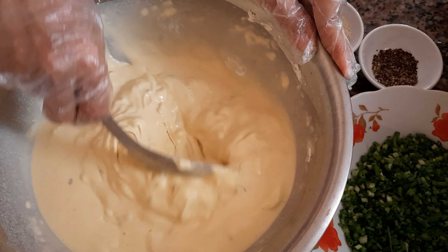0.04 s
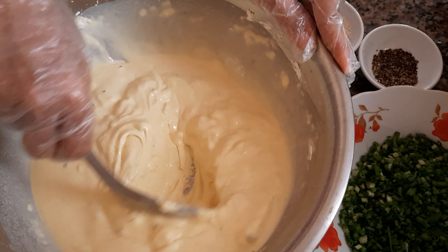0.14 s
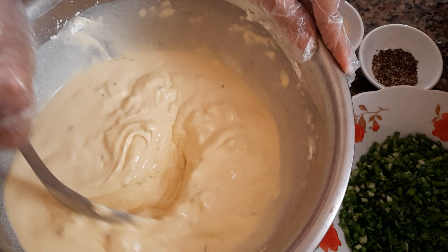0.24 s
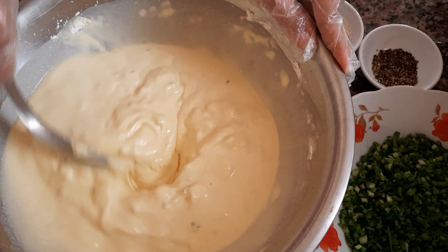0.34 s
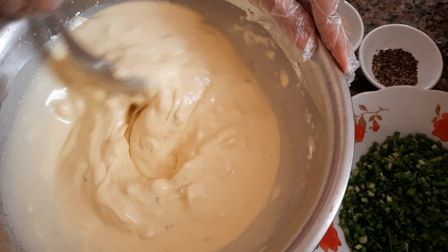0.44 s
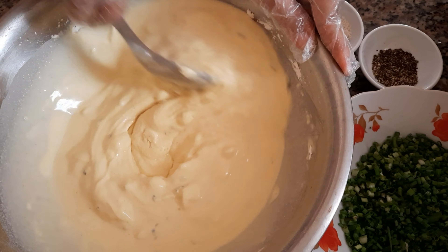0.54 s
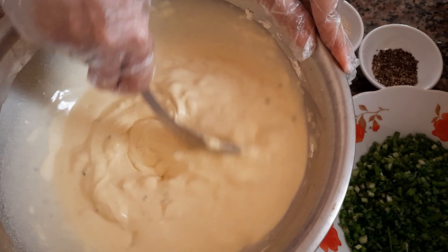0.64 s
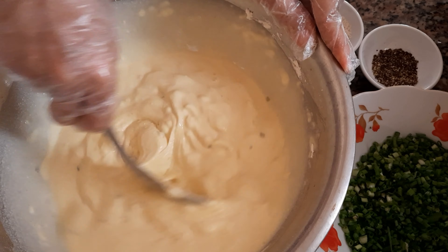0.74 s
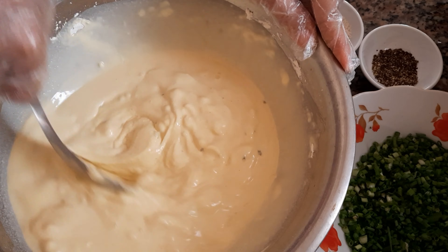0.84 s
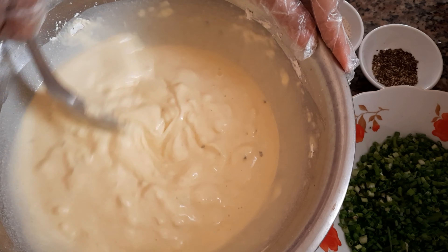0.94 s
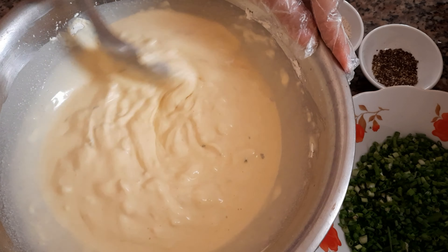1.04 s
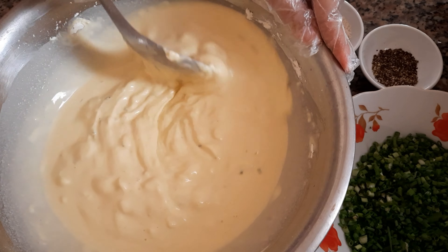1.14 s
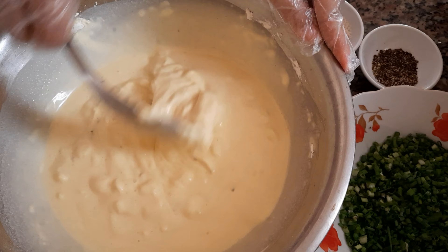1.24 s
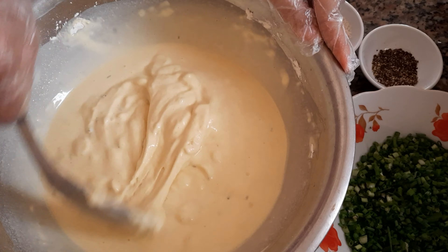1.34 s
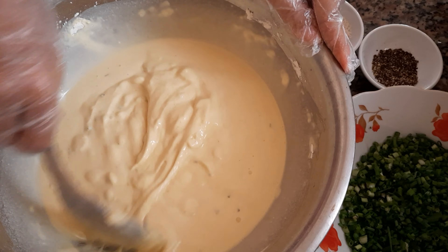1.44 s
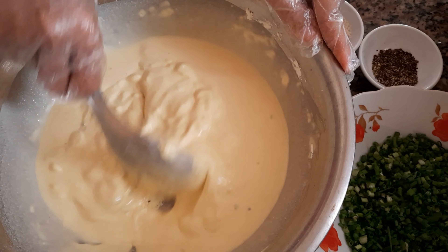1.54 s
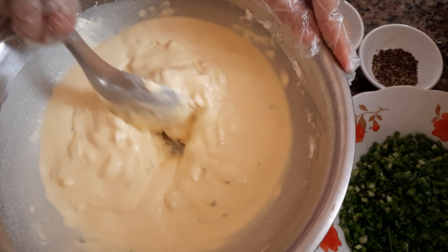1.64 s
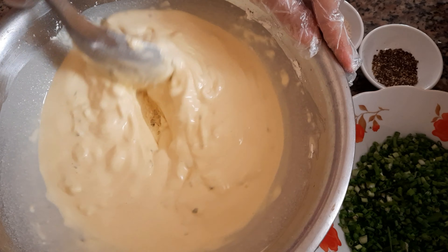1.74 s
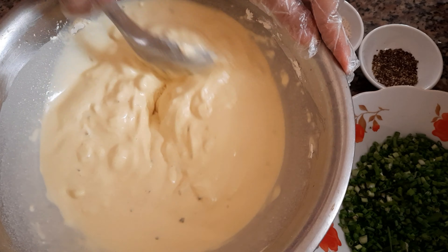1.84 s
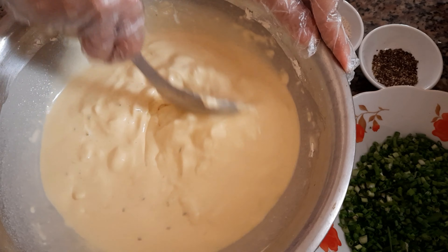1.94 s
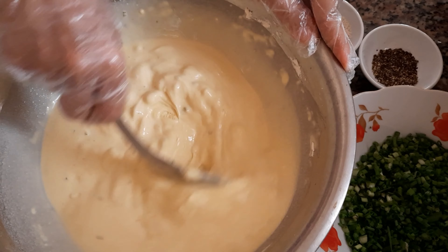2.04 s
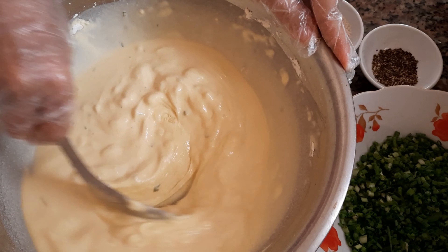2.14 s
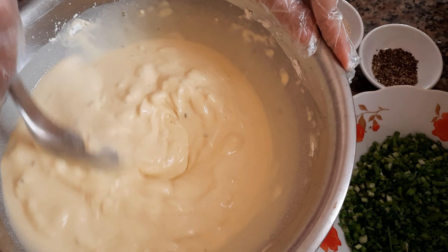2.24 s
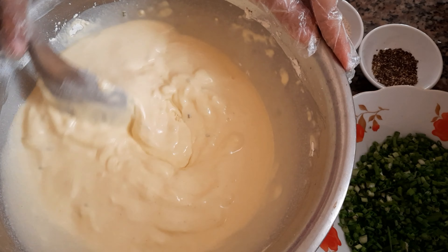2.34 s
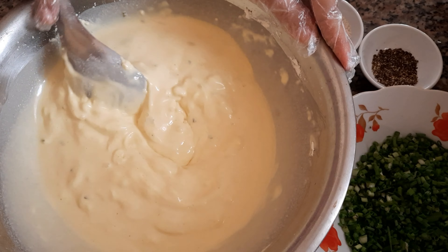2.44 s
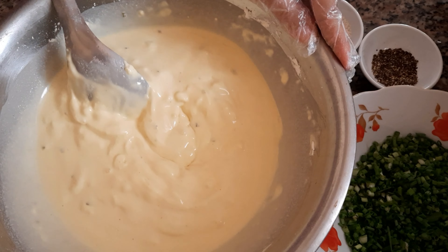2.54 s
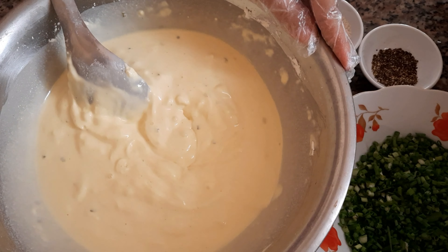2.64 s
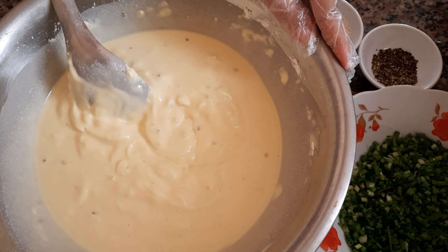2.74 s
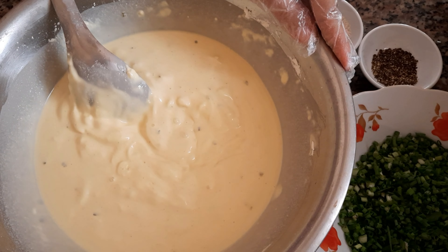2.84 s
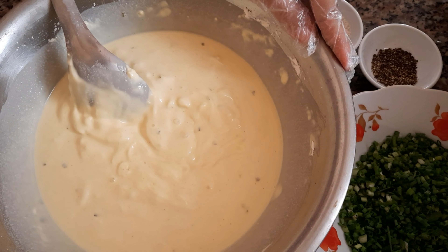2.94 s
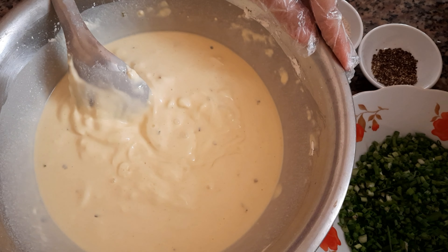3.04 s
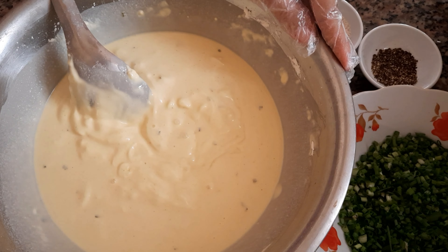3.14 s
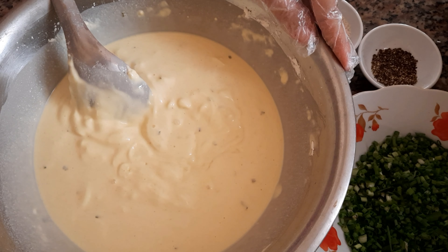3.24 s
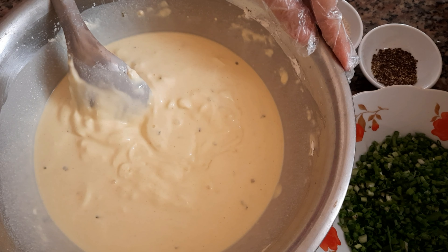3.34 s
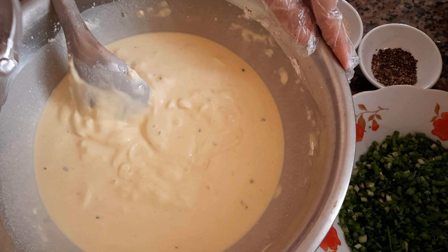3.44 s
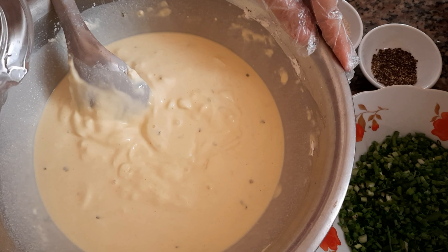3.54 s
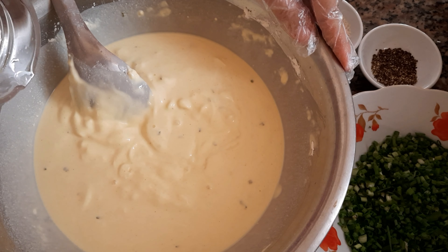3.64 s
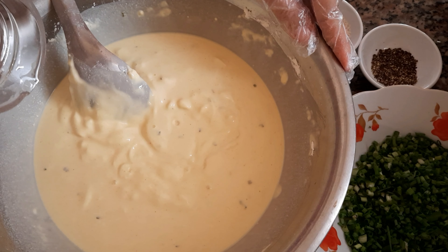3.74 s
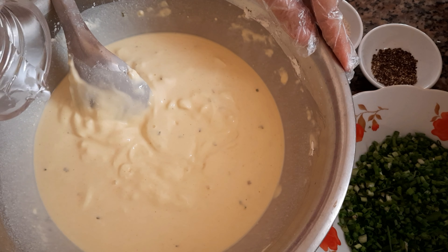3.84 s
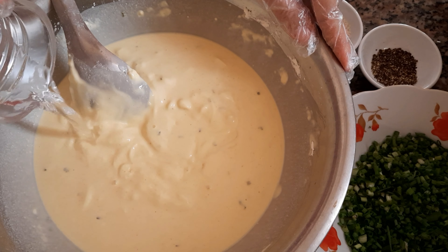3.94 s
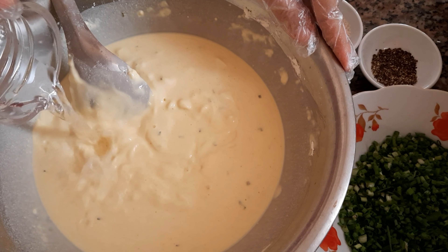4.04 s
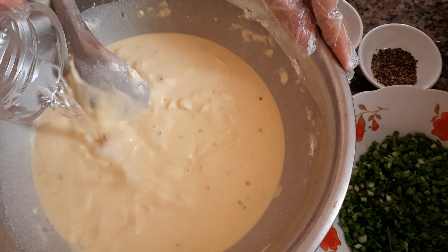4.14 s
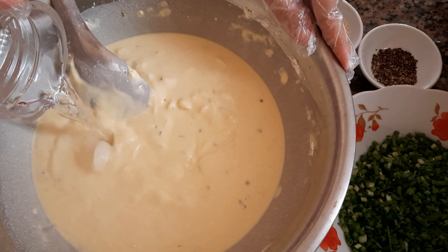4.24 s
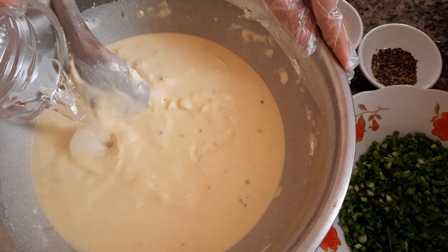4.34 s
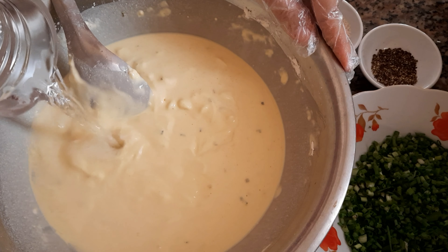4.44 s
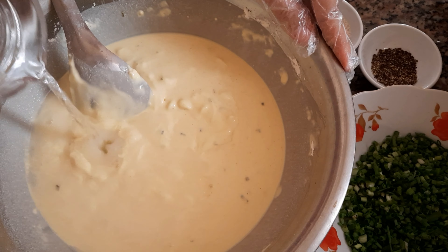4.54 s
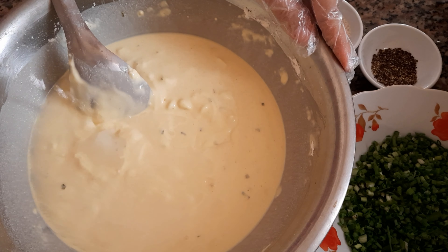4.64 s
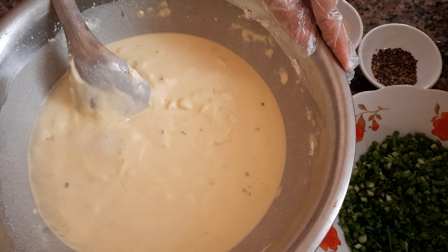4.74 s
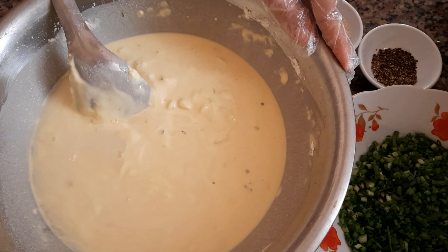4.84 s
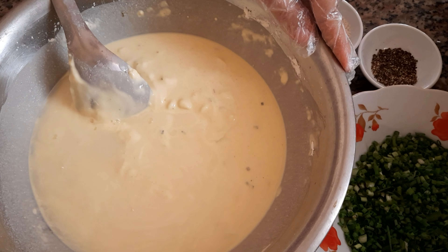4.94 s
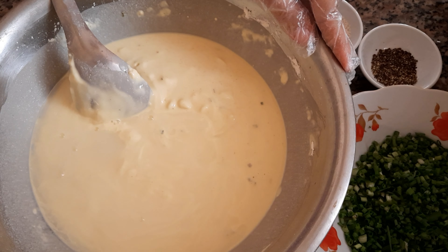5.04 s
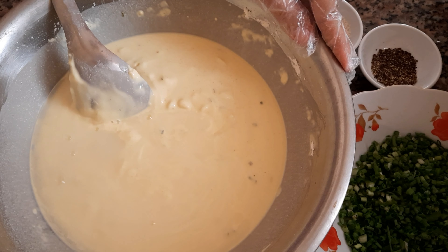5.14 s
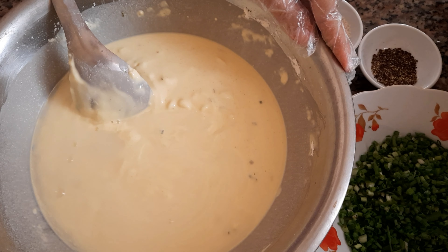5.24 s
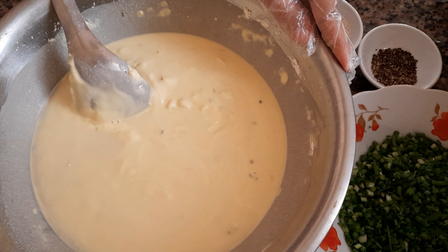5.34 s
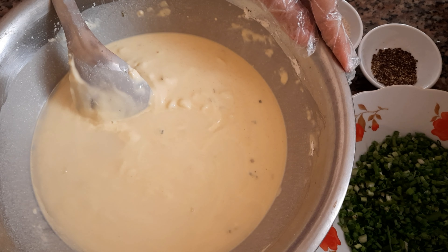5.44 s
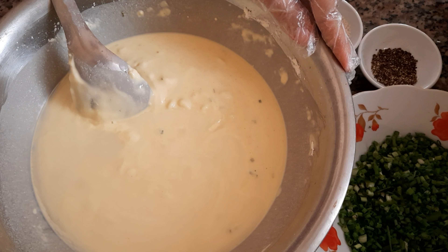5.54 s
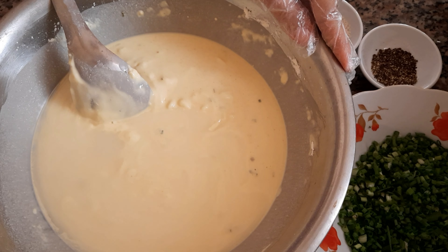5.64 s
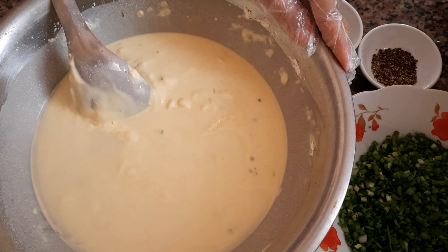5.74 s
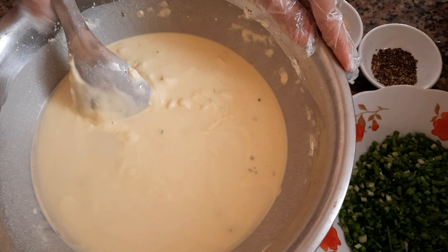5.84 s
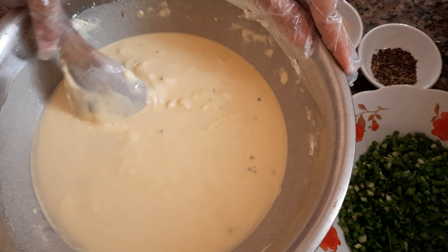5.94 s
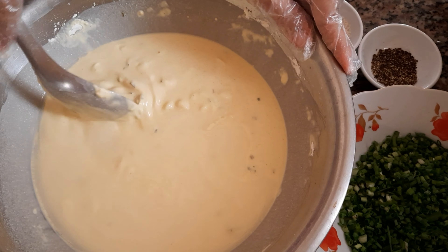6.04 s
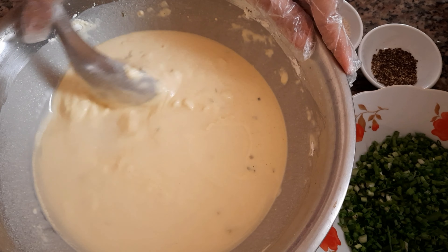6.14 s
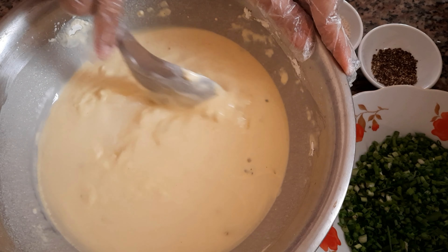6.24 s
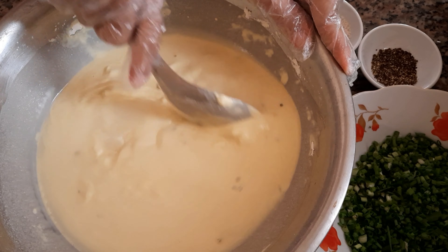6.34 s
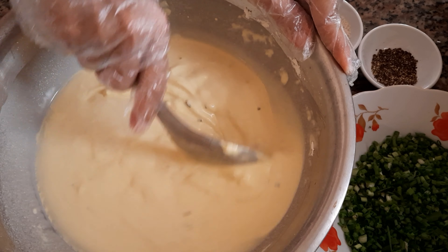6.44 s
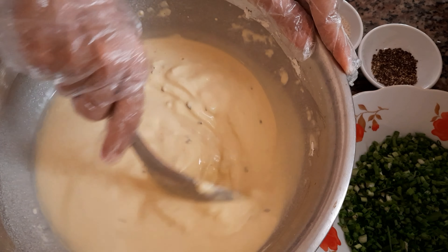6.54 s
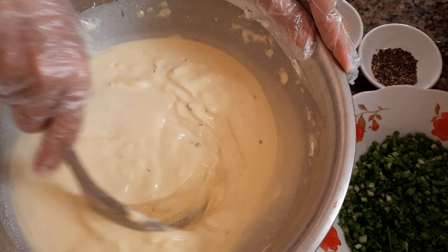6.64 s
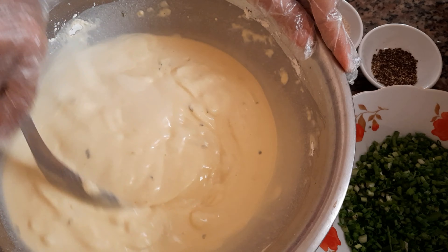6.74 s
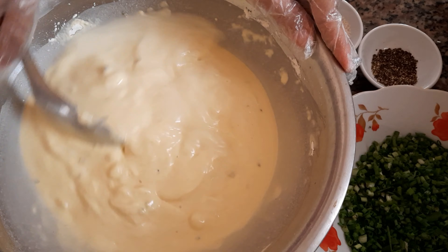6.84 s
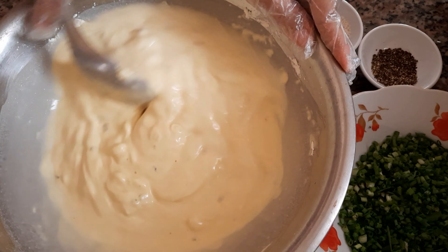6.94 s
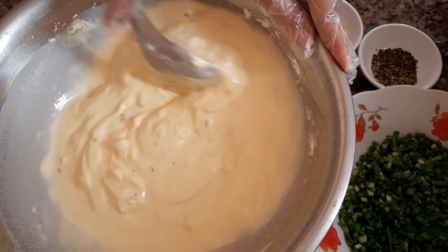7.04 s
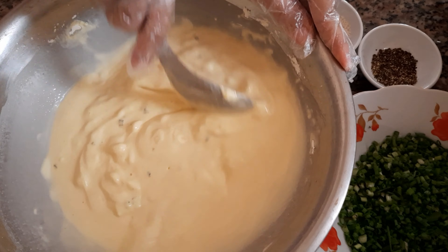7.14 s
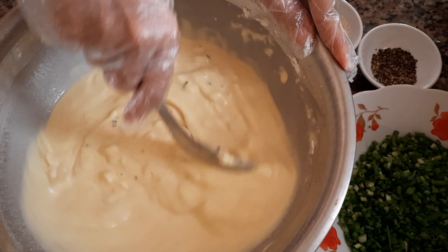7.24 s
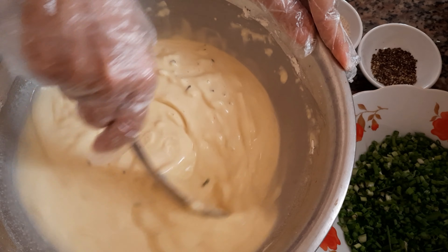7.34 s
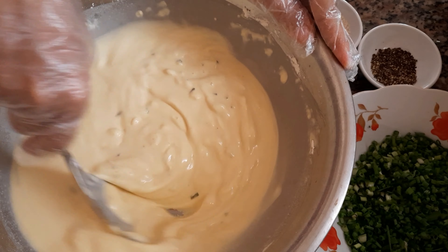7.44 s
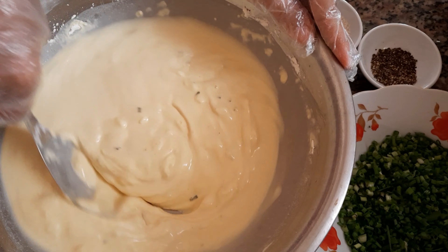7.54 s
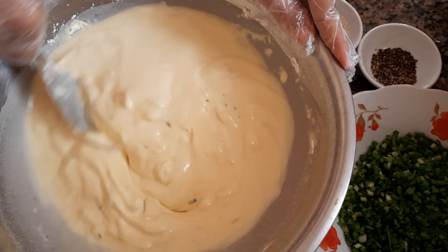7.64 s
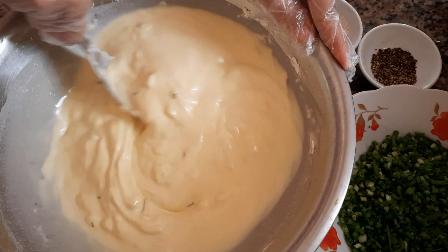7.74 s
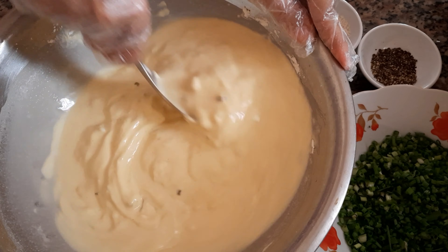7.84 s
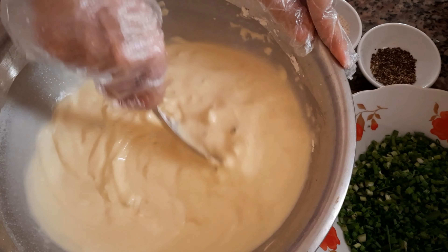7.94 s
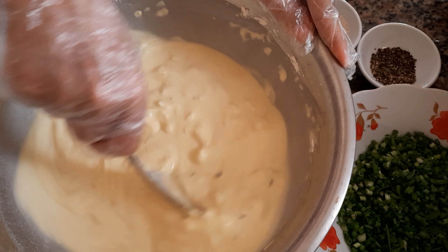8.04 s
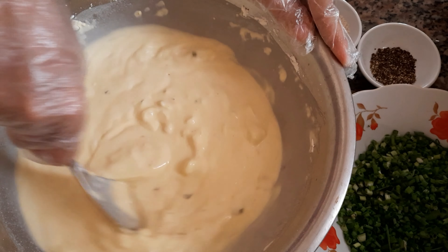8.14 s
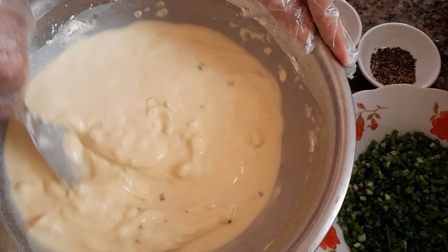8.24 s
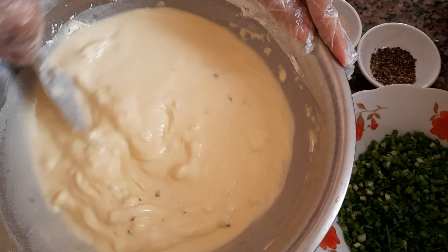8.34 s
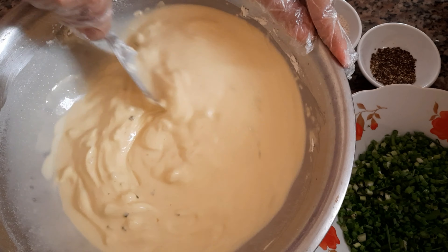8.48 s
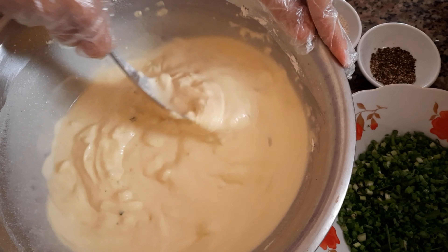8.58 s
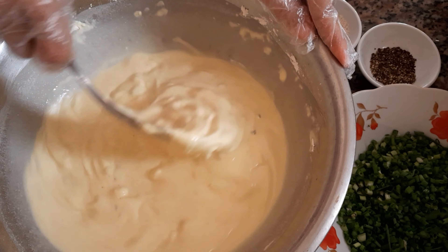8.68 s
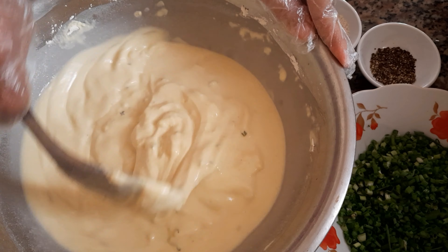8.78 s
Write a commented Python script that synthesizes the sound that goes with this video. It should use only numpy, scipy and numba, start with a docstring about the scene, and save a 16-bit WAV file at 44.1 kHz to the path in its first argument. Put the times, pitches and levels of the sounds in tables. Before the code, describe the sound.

A metal spoon stirs thin batter in a steel bowl, with wet scraping, small squelches and a few dull knocks, while thin plastic gloves crinkle. The stirring stops, a glass jar clinks, and a little water patters onto the batter. The jar is set down with ringing clinks and a hollow note, then the stirring resumes. It is heard close up in a kitchen, with a short echo and a low rumble underneath.

```python
"""A kitchen worktop, with two microphone ports a few centimetres apart just to the right of the work.
A gloved hand stirs batter in a steel bowl, stops, pours water from a glass jar and stirs on.
The steel spoon drags and knocks, ringing the damped bowl; air pockets squelch in the batter and thin
plastic gloves crinkle. The jar clinks, the air inside it hoots, and drops tick on the batter.
Tiles return a short echo, and a low kitchen rumble lies under it all."""
import sys
import numpy as np
from scipy import signal
from scipy.fft import rfft, irfft, next_fast_len
from scipy.io import wavfile
from scipy.ndimage import uniform_filter1d
from numba import njit

SR = 44100
rng = np.random.default_rng(int(sys.argv[2]) if len(sys.argv) > 2 else 0)


def wav_record(signal):
    """Record a signal, one row per channel, as 16-bit PCM in the file named by sys.argv[1]."""
    frames = np.transpose(np.atleast_2d(signal))
    bounded = np.clip(frames, -1, 1)
    # unit amplitude maps onto the largest positive 16-bit level
    quanta = np.round(bounded * 32767).astype(np.int16)
    wavfile.write(sys.argv[1], SR, quanta)


N = 388521

# kitchen and worktop rumble: (time [s], level [dB], boom centre [Hz], part above 170 Hz [relative dB])
RUMBLE_TRACK = [(0.0, -40, 119.7, -3.5), (0.37, -39, 143, -9.5), (0.8, -44.5, 133, -1.5),
                (1.15, -39.5, 113.5, -5.5), (1.8, -43.5, 125, -7), (2.3, -43, 127.4, -6.5),
                (2.5, -41.5, 135.4, -7.5), (3.05, -42.5, 108, -4), (3.8, -52, 103.7, -10),
                (4.5, -50, 102, -6), (5.35, -45, 108.6, -8), (5.55, -35.5, 124, -6.5),
                (5.9, -49.5, 100.5, -12.5), (6.5, -48.5, 99.5, -9), (7.0, -46, 110, -8),
                (7.35, -47, 112.4, 1.5), (7.75, -42.5, 91.5, -2), (8.3, -45.5, 103, 1),
                (8.81, -47, 118.3, 1.5)]
# spectra of the rumble and of the kitchen air: (frequency [Hz], density [relative dB])
RUMBLE_SPECTRUM = [(12, -42.5), (20, -4), (32, -13), (75, -0.5), (140, -0.5), (163, -0.5), (198, -4.5),
                   (345, -25), (520, -36), (680, -71), (1140, -120)]
AIR_SPECTRUM = [(180, -47.5), (300, 9), (978, -31), (2100, -8), (4590, -46.5), (6300, -14.5),
                (11700, -23.5), (15000, -21), (16000, -7)]
# steady work of the hands: (time [s], spoon drag [dB], its upper resonances [relative dB],
# glove rub [dB], its top above 9 kHz [relative dB])
HAND_WORK = [(0.0, -55.5, -3, -78, -2), (0.16, -68.5, -1, -70, 5), (0.24, -52.5, 3.5, -52, -2),
             (0.5, -49.5, -2, -51, -2), (0.72, -61.5, 2, -60.5, -4), (0.85, -56, 4.5, -66, -13),
             (1.12, -46.5, -4, -52, -3), (1.26, -62.5, -3, -70, 2), (1.47, -58, -4, -79, 7),
             (1.7, -57, -6, -62.5, 1), (1.82, -65, 10, -61.5, -2.5), (1.92, -65, -1, -58.5, 0),
             (2.2, -53.5, 5, -54.5, -4), (2.55, -48, -17.5, -51, 0.5), (2.8, -65, 9, -52.5, 0.5),
             (3.0, -53.5, 5.5, -50.5, -2.5), (3.32, -70, -0.5, -75, -4), (3.55, -77.5, 3, -70.5, -1),
             (3.8, -77.5, -1.5, -86.5, 3.5), (4.03, -79.5, 1, -79, 4.5), (4.15, -83, -0.5, -71, -2),
             (4.25, -69, 4, -74.5, -6), (4.52, -67.5, 8.5, -65.5, -2), (4.62, -83, -3, -82, -4),
             (4.78, -54, 0, -51.5, 0), (5.07, -72, 4, -55.5, 0), (5.25, -74.5, 10.5, -67, -13),
             (5.5, -49, 9, -64, -7), (5.8, -57.5, 2, -53.5, 2), (6.18, -68, -3, -60.5, 6),
             (6.46, -54, -10, -57.5, -4), (6.65, -51, 5.5, -59, -3), (6.93, -52, -2, -54, -2),
             (7.08, -64, -4, -61, -6), (7.45, -56, 4, -60, -0.5), (7.86, -54, 1, -60.5, -1),
             (8.3, -56, 2.5, -60, -3), (8.81, -64.5, 6.5, -59, 1)]
# single scrapes and splashes in the bowl, then single rubs of glove on glove or rim:
# (peak time [s], level [dB], 20 dB rise [s], 20 dB fall [s], upper part [relative dB])
# a rise or fall under 3 ms, negative ones included, acts as 3 ms
BOWL_SCRAPES = [(0.0, -48, .01, 0.04, -14), (0.25, -49.5, 0.35, 0.1, -9), (0.493, -46, 0.27, 0.65, -9),
                (1.14, -46, 0, 0.26, -6), (1.497, -42.5, -0.23, 0.05, 5.5), (1.64, -50, 0.23, -0.5, 1),
                (1.905, -33.5, 0.04, 0.2, -34), (2.404, -47.5, 0, 0.43, -3), (2.464, -45, -0.03, 0.37, -6),
                (2.573, -36.5, 0.04, 0.0347, -5), (2.898, -35.5, -0.08, 0.11, -3.5),
                (2.965, -39, -0.1, 0.11, -7), (4.2, -68, 0.5, 0.5, -7), (4.55, -57, -0.08, 0.16, 1.5),
                (4.656, -45.5, -0.17, 0.08, -3), (4.68, -53, 0.18, -1.5, -12), (4.85, -43, -0.35, 0.19, -8),
                (5.35, -60, -0.4, .1, -9), (5.46, -42, 0.03, 0.16, -2), (5.61, -36, 0.09, 0.25, -2),
                (5.939, -39, -0.1, 0.22, -8), (6.046, -50, 0.3, 0.17, 7.5), (6.22, -51.5, -2, 1, 1.5),
                (6.54, -52.5, -1.6, 1.5, -10), (7.11, -56.5, 1, 0.3, 3), (7.21, -50, 0.1, 0.17, 0.5),
                (7.64, -50, .06, 0.8, -18), (7.8, -49, 0.24, .5, -14), (8.52, -45.5, 0.64, 0, -9),
                (8.59, -47.5, 0, 0.04, -5)]
GLOVE_RUBS = [(0.012, -58.5, 2, 0.1, -2), (0.206, -52, 0.07, 0.34, -11), (0.509, -45.5, 0, 0.1, -4.5),
              (0.824, -53.5, 0.13, .5, -1.5), (1.226, -58.5, 0.2, 0, 6), (1.509, -42, -0.19, 0.01, -2),
              (1.585, -34, 0.07, 0.0149, -1.5), (1.66, -31, 0.1067, -0.0073, -9.5), (1.76, -56, 0.03, 0, 5),
              (1.87, -45, -0.23, -0.22, 2), (2.33, -57, 0.1, 1.1, 4.5), (2.574, -43, 0.18, -0.04, 0.5),
              (2.68, -57, 1, -0.2, -11), (2.883, -45.5, -0.2, .5, 0.5), (4.18, -62.5, 0.07, 0.13, 3),
              (4.3, -70, 0, 0.5, -1), (4.69, -56, 0.22, 0.2, -4), (4.75, -55.5, 0.24, 0.4, 1.5),
              (5.3, -53.5, 0.05, 0, -2), (5.37, -52, 0, 0.13, -7), (5.61, -45, 0.12, -0.5, -11),
              (5.691, -44, 0.13, .05, -1), (5.891, -45, 0.03, 0, -2), (5.949, -43.5, -0.02, .5, 0.5),
              (6.07, -44, 0.04, -0.08, 1), (6.22, -55, -1.74, .5, -1), (6.52, -54.5, -0.5, 1, -6),
              (6.83, -49.5, -0.4, 0.23, -1.5), (7.16, -53, -0.03, 0.1, 2), (7.33, -58, -1.5, 0.5, -5),
              (7.45, -54.5, -0.04, 0.8, -4), (7.62, -49, 0, 0.17, 2), (7.929, -53.5, 0.05, -0.75, 6),
              (8.18, -54.5, 0.1, -4, 0.5), (8.449, -50, 0.1, -0.17, 0), (8.594, -44.5, -0.02, 0, 3.5),
              (8.79, -50, 0, 0, 6)]
# resonances of the batter-damped bowl: (frequency [Hz], width [Hz], level [relative dB])
BOWL_MODES = [(685, 130, 0.5), (1027, 170, -5.5), (1290, 420, -1), (2110, 950, -2.5), (381, 350, -6),
              (1963, 110, -11.5), (2536, 100, -8.5), (4220, 400, -8)]
# crackle of thin plastic: (frequency [Hz], density [relative dB])
GLOVE_SPECTRUM = [(1180, -14.5), (2000, -5), (2220, -2.5), (3310, -4), (4410, -5), (4770, -6.5),
                  (8260, 1.5), (9740, -15), (13100, -8), (14900, -12.5), (16000, -23.5)]
# glove folds snapping: (time [s], peak [dB], centre [Hz], left minus right [dB])
GLOVE_FOLDS = [(0.205, -36, 6100, -2), (0.4973, -38, 3530, -9), (0.6345, -36.5, 7900, -3),
               (0.826, -41, 6560, -12), (0.9877, -44, 4970, 1.0), (1.075, -44, 5060, 1.5),
               (1.223, -35, 6100, -8), (1.3304, -61, 6000, -8), (1.3468, -42, 12700, 1.5),
               (1.4765, -49, 7040, 0.5), (1.502, -38.5, 4240, 7), (1.512, -30, 6420, 5),
               (1.549, -31, 2500, -0.5), (1.5868, -32, 4200, -1), (1.6575, -25, 2380, -2.5),
               (1.6588, -23, 6550, -2), (1.784, -45, 6100, -2), (2.2925, -29, 6440, 0),
               (2.458, -35, 8370, 0.0), (2.7876, -77, 7860, 17), (3.131, -37, 8170, 9),
               (3.245, -48, 8030, 7), (3.253, -42, 8710, 5), (3.305, -43.5, 12000, 4),
               (3.3588, -44, 8850, 10), (3.3862, -48, 5500, 2), (3.3972, -40, 13100, 5),
               (3.426, -41.5, 12900, 5), (3.465, -45.5, 6300, 8), (3.5026, -47.5, 5650, 3),
               (3.5358, -50, 13000, 4.5), (3.5558, -49, 12200, -3), (3.5698, -48, 12800, 3),
               (3.6097, -54, 5240, 3), (3.6157, -49, 10800, 2.2), (3.6391, -52, 11100, 5),
               (3.677, -56, 7200, 4), (3.7099, -55, 8550, 3), (3.7553, -57.5, 13900, 6),
               (3.7867, -46, 11540, 8), (3.8222, -52, 12000, 2.5), (3.8347, -42.5, 13100, 6),
               (4.681, -30, 3750, -2), (4.7223, -36.5, 12700, 9), (4.7528, -33, 9000, 13),
               (4.7986, -37.5, 3120, 13), (4.825, -42, 6200, 8), (5.065, -40, 6740, 7),
               (5.2924, -49, 6200, 0), (5.8589, -51, 4860, 1.0), (5.939, -32.5, 7100, -3),
               (6.4106, -39, 12800, -3), (6.462, -44, 11000, 0), (6.8052, -36, 3590, 7),
               (6.933, -34, 4700, 11), (7.4328, -47, 7160, -0.5), (7.6169, -33.5, 8450, 1.5),
               (7.691, -33.5, 8110, -3), (7.776, -32.5, 9000, -5), (7.8773, -47, 5410, 5),
               (8.564, -39, 6890, 0.0), (8.5935, -34, 12000, -0.5), (8.652, -44, 7000, 0.6),
               (8.7089, -39.5, 10200, 1.0), (8.7885, -36, 6900, 10)]
# pitched blips, mostly bubbles in batter and water:
# (middle time [s], pitch [Hz], level [dB], half length [s])
BUBBLES = [(0.207, 2910, -49, 0.014), (0.315, 2300, -48.5, 0.019), (0.35, 4540, -50, 0.028),
           (0.544, 689, -49, 0.0079), (0.67, 2510, -58, .02), (0.7, 720, -52, 0.013),
           (0.886, 2430, -52, 0.018), (1.038, 1033, -53, 0.029), (1.11, 2320, -56, .015),
           (1.127, 5040, -52.5, 0.05), (1.151, 1006, -35, 0.011), (1.496, 670, -44.5, 0.013),
           (1.522, 6400, -47, 0.012), (1.911, 642, -34.5, 0.046), (2.252, 2620, -45, 0.011),
           (2.301, 990, -48, 0.011), (2.457, 1560, -49, 0.021), (2.577, 1210, -40, 0.011),
           (4.204, 654, -59, .009), (4.215, 1570, -62, 0.015), (4.232, 960, -63, .009),
           (4.307, 1350, -58, 0.0066), (4.338, 662, -61, 0.0071), (4.395, 656, -62, .014),
           (4.43, 1750, -64, .012), (4.47, 1580, -61.5, 0.0086), (4.545, 2440, -54, .007),
           (4.575, 1560, -56, .007), (4.518, 4420, -55, 0.01), (4.525, 2750, -53, 0.0094),
           (4.778, 3900, -57, 0.014), (4.83, 6200, -46, 0.018), (4.847, 2680, -45, 0.014),
           (4.846, 950, -39.5, 0.0067), (4.849, 767, -38.5, 0.012), (4.87, 1185, -46, 0.025),
           (5.236, 1606, -61, 0.045), (6.247, 646, -53, 0.022), (6.254, 1230, -49, 0.016),
           (6.525, 760, -44.5, 0.045), (6.618, 4000, -52.5, 0.052), (6.632, 2600, -55, 0.0071),
           (6.721, 2100, -42.5, 0.01), (6.745, 2150, -49, 0.011), (6.776, 2310, -49, .007),
           (6.81, 3670, -49, 0.028), (6.853, 4500, -49, 0.073), (6.926, 4550, -50, 0.013),
           (7.12, 634, -42, 0.0089), (7.175, 1010, -51, .02), (7.2, 1975, -59, .05),
           (7.21, 2540, -63, 0.034), (7.524, 2900, -56, 0.043), (7.652, 1945, -55, .035),
           (7.908, 1020, -50, 0.014), (8.145, 3950, -58, 0.026), (8.497, 700, -48, .008),
           (8.507, 850, -45, .007), (8.526, 680, -47, .008), (8.519, 1040, -45, 0.019)]
# spoon striking the bowl: (time [s], level [dB], pitch [Hz], ring t60 [s], clack [relative dB],
# crack [relative dB], left minus right [dB])
SPOON_KNOCKS = [(0.498, -35, 1050, 0.018, -6, -14, 4), (0.934, -36.5, 644, 0.023, 5, -20, -6),
                (1.155, -26.5, 700, 0.046, -7.5, -28, 0), (1.663, -23.5, 980, 0.018, 6, -26, 0.5),
                (1.883, -20, 750, 0.016, -6.5, -26, 0.5), (2.476, -33.5, 1100, 0.027, -1, 0, -3),
                (4.651, -42, 660, 0.073, -21, 5, -8), (4.679, -37.5, 1273, 0.028, 3, -17, 3),
                (5.937, -34.5, 675, 0.044, -2, -7, -2.0), (6.203, -23, 685, 0.019, -12, -38.5, -1.5),
                (7.188, -38, 290, 0.026, -12.5, -5, -9.5), (8.574, -38, 312, 0.031, -4, -1, -4)]
# spoon edge catching on the steel: (time [s], peak [dB], centre [Hz])
SPOON_CATCHES = [(1.5835, -14.5, 3700), (1.5852, -15.5, 5600), (1.5868, -18, 4300), (1.6622, -13, 1600),
                 (1.665, -18, 1600), (1.668, -23.5, 900)]
# air in the jar at each jolt: (time [s], pitch [Hz], level [dB], rise [s], hold [s], fall [s])
JAR_HOOTS = [(2.886, 400, -35.5, 0.0064, .005, 0.034), (2.915, 369, -27, 0.029, .004, 0.0087),
             (2.953, 420, -29, 0.0045, 0.0026, 0.021), (2.975, 320, -25, 0.0054, 0.0016, 0.0041),
             (2.982, 372.4, -24.5, 0.011, 0.011, 0.048), (4.7703, 381, -21.5, 0.0066, 0.0026, 0.0061),
             (4.782, 361, -25.5, 0.0055, .004, 0.052), (4.814, 375, -34, .006, .006, .01),
             (4.834, 364, -31, 0.0059, 0.0028, 0.029), (4.865, 356, -46, 0.0041, 0.023, 0.053),
             (5.406, 332, -30, 0.0053, 0.0126, 0.0024), (5.423, 356, -33, 0.021, 0.029, 0.13),
             (5.547, 373, -28, 0.006, 0.02, .02), (5.577, 356.2, -23.5, 0.0047, 0.057, 0.085),
             (5.708, 355, -48, 0.014, .06, 0.05), (4.907, 368, -52, .01, .02, 0.031)]
# jar touching the worktop: (time [s], ring peak [dB], thud [relative dB], favoured pitch [Hz],
# fall-off around it [dB/octave], worktop thump [relative dB], ring time [factor], contact [s],
# weaker modes [relative dB])
JAR_TOUCHES = [(2.892, -35, -9, 2690, 9, -11, 1, 0.00068, 2),
               (2.9245, -38, 3, 2300, 6.5, -15.5, 0.89, .0008, -8),
               (2.973, -30.5, -1.5, 2150, 33, -24, 0.96, 0.00074, -4),
               (5.3505, -38.5, -9, 1860, 24, -12.5, 0.65, 0.0013, 3.5),
               (5.3540, -41.5, -25, 2800, 29, -22, 4.1, .003, 0),
               (5.4050, -20.5, -8, 2630, 4, -18, 0.76, 0.0014, -11.5),
               (5.442, -36.5, -12, 5100, 7, -20, .8, .004, -10),
               (5.471, -36, -9, 2190, 16, -6, 1.1, 0.0035, -3),
               (5.5454, -22, 6, 2120, -5, -10.5, 1.15, 0.00063, 4.5),
               (5.574, -21.5, -0.5, 5370, 26, -11, 0.49, 0.0026, -2),
               (5.575, -29.5, -12, 2200, 25, -20, 0.37, 0.0045, -2)]
# modes of the glass: (frequency [Hz], level [relative dB], t60 [s])
GLASS_MODES = [(1080, -26, 0.18), (1163, -5, 0.32), (1505, -7.5, 0.59), (1770, -13, 0.081),
               (2040, 8, 0.042), (2165, -2, 0.16), (2864, 0.5, 0.11), (3380, -5.5, 0.12), (3880, -9, 0.15),
               (4290, -14, 0.28), (4710, -1, 0.12), (4920, 0, 0.1), (5390, -0.5, 0.11), (5370, -17, 0.2),
               (6030, -5, 0.12), (8400, -11, 0.12)]
# modes that ring most readily, the rest count as weaker: (row of GLASS_MODES [index])
STRONG_ROWS = [4, 5, 6, 11, 12]
# water landing on the batter: (time [s], peak [dB], centre [Hz], left minus right [dB])
WATER_DROPS = [(3.9345, -56.5, 11300, 3.5), (3.9844, -60, 8100, 0), (3.9988, -50, 11900, 9),
               (4.0267, -55.5, 8640, 1.0), (4.0377, -53, 8820, 0.0), (4.0464, -55, 4660, 3),
               (4.058, -51, 4700, 0), (4.0674, -41.5, 5980, -4), (4.0886, -44.5, 8370, -7),
               (4.098, -39, 5720, -7), (4.151, -37.5, 6500, -8), (4.164, -43, 10900, -7.5),
               (4.1754, -45, 14200, -4), (4.2023, -39, 12400, -4), (4.2144, -45, 4690, -2.0),
               (4.2677, -51, 8400, 3), (4.2832, -41.5, 7800, -12), (4.289, -40, 12500, -7),
               (4.299, -42, 6860, -12), (4.3104, -57, 4800, 1), (4.333, -39, 5700, -7),
               (4.352, -48, 8950, -16), (4.3564, -46, 11700, -3.0), (4.3799, -46, 7400, -11),
               (4.3914, -43, 13400, -0.5), (4.4664, -54, 14000, -2), (4.4734, -37, 10600, -7),
               (4.49, -40, 5880, 0.0), (4.5072, -40, 14100, 0.0), (4.513, -41, 4370, -8),
               (4.5224, -47, 12200, -2.5), (4.5324, -43, 12100, -8), (4.5424, -47, 6470, -1.5),
               (4.6024, -56, 6760, 1), (4.6174, -38, 12300, -2.5), (4.6294, -51, 6710, 10),
               (4.6404, -47, 13900, -1), (4.6503, -48, 6220, -4), (4.658, -41, 4100, 0.0),
               (4.674, -32, 4110, -2)]


def undb(db):
    return 10 ** (np.asarray(db) / 20)


def unit_rms(x):
    return x / np.sqrt(np.mean(x ** 2))


def unit_peak(x):
    return x / np.abs(x).max()


def seconds(length_s):
    return np.arange(int(length_s * SR)) / SR


def fade(t, t60):
    return np.exp(-np.log(1000) * t / max(t60, .003))


def ramp(t, rise_s):
    return np.clip(t / rise_s, 0, 1)


def add(out, start_s, x):
    i = int(start_s * SR)
    x = x[..., :N - i]
    out[..., i:i + x.shape[-1]] += x


def curves(table):
    """Columns of a table, joined by straight lines in time."""
    times, *columns = np.transpose(table)
    return [np.interp(np.arange(N) / SR, times, column) for column in columns]


def colour(x, spectrum):
    """Shape the spectrum by (frequency [Hz], level [dB]) points on a log axis."""
    hz, db = np.transpose(spectrum)
    size = next_fast_len(N)
    bin_hz = np.maximum(np.arange(size // 2 + 1) * SR / size, 1)
    gain = undb(np.interp(np.log(bin_hz), np.log(hz), db))
    return irfft(rfft(x, size) * gain, size)[..., :N]


def butter(x, kind, hz, order):
    return signal.sosfilt(signal.butter(order, hz, kind, fs=SR, output="sos"), x)


def band(x, hz, width_hz):
    """One resonance, gain 1 at its centre."""
    return signal.lfilter(*signal.iirpeak(min(hz, .4 * SR), hz / width_hz, fs=SR), x)


@njit
def moving_band(x, hz, q):
    """State-variable band-pass whose centre moves."""
    out = np.empty(len(x))
    band_state, low_state, damping = 0., 0., 1 / q
    for i in range(len(x)):
        g = np.tan(np.pi * hz[i] / SR)
        passed = (band_state + g * (x[i] - low_state)) / (1 + g * (g + damping))
        band_state = 2 * passed - band_state
        low_state += 2 * g * passed
        out[i] = damping * passed
    return out


def wander(rate_hz):
    """Random levels, each held for one period and slewed; spread near 1."""
    hold = int(SR / rate_hz)
    steps = np.repeat(rng.standard_normal(N // hold + 1), hold)
    return uniform_filter1d(steps, hold // 2)[:N]


def grains(per_second, spread_db):
    """Scattered clicks, many small and a few large."""
    out, count = np.zeros(N), int(per_second * N / SR)
    size_db = spread_db * np.minimum(rng.exponential(size=count), 4)
    out[rng.integers(0, N, count)] = np.sign(rng.random(count) - .5) * undb(size_db)
    return out


def effort(steady_db, upper_db, events):
    """Gains of a layer's body and upper part: steady work plus swells that run in straight dB lines."""
    t, swells = np.arange(0, N, 32) / SR, 0
    for peak_s, db, rise, fall, part_db in events:
        away = np.where(t < peak_s, (peak_s - t) / max(rise, .003), (t - peak_s) / max(fall, .003))
        swells += undb(db - 20 * away + np.array([[0], [part_db]])) ** 2
    body, upper = [np.interp(np.arange(N) / SR, t, power) for power in swells]
    return np.sqrt([undb(steady_db) ** 2 + body, undb(steady_db + upper_db) ** 2 + upper])


def ports(x, lag_samples, pan_db=0.):
    """The microphone pair: sound reaches the left port first; pan_db is left minus right."""
    samples = np.arange(len(x))
    late = np.interp(samples - lag_samples, samples, x)
    return np.array([x * undb(pan_db / 2), late * undb(-pan_db / 2)])


def kitchen_rumble():
    """Low noise with a wandering boom, nearly the same at both ports."""
    level_db, boom_hz, upper_db = curves(RUMBLE_TRACK)
    parts = []
    for noise in colour(rng.standard_normal((2, N)), RUMBLE_SPECTRUM):
        upper = butter(noise, "high", 170, order=4)
        boom = noise - upper + 1.33 * moving_band(noise, boom_hz, q=3.6)
        parts.append(unit_rms(boom) + undb(upper_db) * unit_rms(upper))
    mid, side = parts
    left_right = np.array([[1], [-1]])
    return (mid + undb(-14) * side * left_right) * undb(level_db + .4 * left_right)


def kitchen_air():
    """Faint steady room tone, unrelated at the two ports."""
    return undb(-66) * unit_rms(colour(rng.standard_normal((2, N)), AIR_SPECTRUM))


def spoon_drag(body_gain, upper_gain, drift_octaves=.056, swell_db=3.5):
    """Dense slips of the spoon ring the bowl; each resonance drifts and swells as the batter shifts."""
    moves = [(hz * 2 ** (drift_octaves * wander(7)), undb(db + swell_db * wander(14)))
             for hz, _, db in BOWL_MODES]
    out = np.zeros((2, N))
    for lag_samples in (4, 15):  # near and far wall
        wall = np.zeros(N)
        for (hz, width_hz, _), (drifting_hz, swell) in zip(BOWL_MODES, moves):
            ring = moving_band(grains(4000, spread_db=2.5), drifting_hz, q=hz / width_hz)
            gain = upper_gain if hz > 1200 else body_gain
            wall += gain * swell * unit_rms(ring)
        out += ports(wall, lag_samples, pan_db=-2)
    return .24 * out


def glove_rustle(body_gain, top_gain):
    """Thin plastic rubs at three places on the hands: patchy crackle with a wandering wet squeak."""
    out = np.zeros((2, N))
    squeak_hz = 5170 * 2 ** (.31 * wander(12))
    for lag_samples, pan_db in [(4.23, 9.5), (1.06, -6.5), (9, -2.5)]:
        clicks = grains(2000, spread_db=1.5) + 2 * grains(60, spread_db=2)
        crackle = colour(clicks * undb(1.9 * wander(60)), GLOVE_SPECTRUM)
        low = butter(crackle, "low", 8400, order=6)
        squeak = .96 * moving_band(low, squeak_hz, q=2.2)
        body = unit_rms(low + squeak) * undb(2.77 * wander(30))
        top = unit_rms(butter(crackle, "high", 9100, order=6)) * undb(3.1 * wander(30))
        out += ports((body_gain * body + top_gain * top) / np.sqrt(3), lag_samples, pan_db)
    return out


def batter_squelches(drag_gain, clusters=130, lowest_hz=1800, range_octaves=1.7):
    """Small air pockets tear in the batter, five to a cluster, louder as the spoon drags harder."""
    out, t = np.zeros((2, N)), np.arange(-.005, .005, 1 / SR)
    centres = rng.random((clusters, 2))
    for (when, pitch), pockets in zip(centres, rng.standard_normal((clusters, 5, 4))):
        for late, detune, size, pan in pockets:
            start_s = np.clip(when * N / SR + .03 * late, 0, (N - 1) / SR)
            hz = lowest_hz * 2 ** (range_octaves * pitch + .12 * detune)
            tone = np.hanning(len(t)) * np.sin(2 * np.pi * hz * t)
            gain = drag_gain[int(start_s * SR)] * undb(-5 + 2.5 * size)
            add(out, start_s, ports(gain * tone, 6, pan_db=3 * pan))
    return out


def bubbles():
    """Each swells and fades on a barely rising pitch, roughened as the pocket of air tears."""
    out, roughness = np.zeros((2, N)), .6 + .7 * wander(400)
    for (middle_s, hz, db, half_s), pan in zip(BUBBLES, rng.standard_normal(len(BUBBLES))):
        t = np.arange(-half_s, half_s, 1 / SR)
        tone = np.hanning(len(t)) * np.sin(2 * np.pi * hz * t * (1 + .013 * t / half_s))
        add(out, middle_s - half_s, ports(undb(db) * tone, .93, pan_db=2 * pan))
    return out * roughness


def glove_crinkles():
    """Single folds of plastic snap, each a short burst in one broad band."""
    out, t = np.zeros((2, N)), seconds(.03)
    for start_s, db, hz, pan_db in GLOVE_FOLDS:
        burst = rng.standard_normal(len(t)) * ramp(t, .00088) * fade(t, .02)
        snap = unit_peak(band(burst, hz, .5 * hz))
        add(out, start_s, ports(undb(db) * snap, .99, pan_db))
    return out


def spoon_knocks():
    """Each blow: a short ring of the wall where the spoon lands, a broad clack and a crack of steel."""
    out, t = np.zeros((2, N)), seconds(.15)
    attack = ramp(t, .00062)
    for start_s, db, hz, t60, clack_db, crack_db, pan_db in SPOON_KNOCKS:
        noise = attack * rng.standard_normal((2, len(t)))
        ring = attack * fade(t, t60) * np.sin(2 * np.pi * hz * t)
        clack = unit_peak(band(noise[0] * fade(t, 1.5 * t60), 2150, 1300))
        crack = unit_peak(band(noise[1] * fade(t, .025), 6200, 3500))
        blow = ring + undb(clack_db) * clack + undb(crack_db) * crack
        add(out, start_s, ports(undb(db) * blow, 5.7, pan_db))
    return out


def spoon_catches(width_share=.65):
    """The spoon's edge catches on the steel: one push rings a broad resonance for a few cycles."""
    out = np.zeros((2, N))
    for start_s, db, hz in SPOON_CATCHES:
        ring = band(-signal.unit_impulse(400), hz, width_share * hz)
        tick = unit_peak(band(ring, hz, 2 * width_share * hz))
        add(out, start_s, ports(undb(db) * tick, 2.78, pan_db=-1.5))
    return out


def jar_hoots():
    """At each jolt the air in the jar sounds one unsteady tone, over the rattle of the jar's foot."""
    out, waver_hz = np.zeros((2, N)), 8 * wander(45)
    rattle = band(rng.standard_normal(N), 375, 220)
    rattle = undb(-14) * unit_rms(band(rattle, 374, 320))
    for start_s, hz, db, rise, hold, fall in JAR_HOOTS:
        length_s, first = rise + hold + fall, int(start_s * SR)
        t = np.arange(0, length_s, 1 / SR)
        here = slice(first, first + len(t))
        envelope = ramp(t, rise) * ramp(length_s - t, fall) ** 1.24
        tone = np.sqrt(2) * np.sin(2 * np.pi * np.cumsum(hz + waver_hz[here]) / SR)
        add(out, start_s, ports(undb(db) * envelope * (tone + rattle[here]), 11.6))
    return out * undb(1.2 * wander(120))


def jar_clinks(detune_share=.004, chatter_depth=.4, crack_db=-9.5):
    """Every touch on the worktop rings the same glass modes over a gritty crack, a thud and a thump."""
    out, t = np.zeros((2, N)), seconds(.4)
    mode_hz, mode_db, t60 = np.transpose(GLASS_MODES)[:, :, None]
    is_weak = ~np.isin(np.arange(len(GLASS_MODES)), STRONG_ROWS)[:, None]
    scatter = rng.standard_normal((len(JAR_TOUCHES), 2, len(GLASS_MODES), 1))
    noises = rng.standard_normal((len(JAR_TOUCHES), len(t)))
    for touch, (scatter_db, detune), noise in zip(JAR_TOUCHES, scatter, noises):
        start_s, db, thud_db, favoured_hz, falloff, thump_db, ring_scale, contact_s, weak_db = touch
        # the point of contact favours the modes near one pitch
        octaves_off = np.abs(np.log2(mode_hz / favoured_hz))
        strength = undb(mode_db - falloff * octaves_off + weak_db * is_weak + scatter_db)
        jitter = uniform_filter1d(rng.standard_normal((len(GLASS_MODES), len(t))), size=400)
        chatter = 1 + chatter_depth * unit_rms(jitter)
        decay = np.exp(-np.log(1000) * t / (t60 * ring_scale))
        phase = 2 * np.pi * mode_hz * (1 + detune_share * detune) * t
        glass = np.sum(strength * chatter * decay * np.exp(1j * phase), axis=0)
        # glass modes radiate in lobes: they reach the two ports a quarter cycle apart
        ring = ramp(t, contact_s) * np.array([glass.imag, glass.real])
        ring /= np.abs(ring.mean(axis=0)).max()
        thud = unit_peak(band(band(noise * fade(t, .07), 300, 660), 340, 1240))
        thump = fade(t, .25) * np.sin(2 * np.pi * 190 * t)
        crack = unit_peak(band(noise[::-1] * fade(t, .071 * ring_scale), 5800, 7000))
        impact = undb(thud_db) * thud + undb(thump_db) * thump + undb(crack_db) * crack
        add(out, start_s, undb(db) * (ring + ports(impact, 5.3)))
    return out


def water_drops(width_share=.34):
    """Poured drops tick on the batter, each short and at its own pitch and place."""
    out, t = np.zeros((2, N)), seconds(.02)
    for start_s, db, hz, pan_db in WATER_DROPS:
        burst = rng.standard_normal(len(t)) * fade(t, t60=.017)
        ring = band(burst, hz, width_share * hz)
        tick = unit_peak(band(ring, hz, 2 * width_share * hz))
        add(out, start_s, ports(undb(db) * tick, 3, pan_db))
    return out


def room_echo(direct, level_db=-13.5):
    """Tiles and worktop return a short, dulled, diffuse tail, different at each port."""
    t = seconds(.4)
    tail = rng.standard_normal((2, len(t))) * ramp(t, .00091) * fade(t, t60=.27)
    tail = butter(tail, "low", 5990, order=1)
    tail /= np.sqrt(np.sum(tail ** 2, axis=1, keepdims=True))
    return undb(level_db) * signal.fftconvolve(direct.mean(axis=0)[None], tail, axes=1)[:, :N]


def scene():
    """Work at the bowl close to the microphone, its echo, and the kitchen behind."""
    drag_db, drag_upper_db, rub_db, rub_top_db = curves(HAND_WORK)
    drag_body, drag_upper = effort(drag_db, drag_upper_db, BOWL_SCRAPES)
    rub_body, rub_top = effort(rub_db, rub_top_db, GLOVE_RUBS)
    close = spoon_drag(drag_body, drag_upper)
    close += glove_rustle(rub_body, rub_top) + glove_crinkles()
    close += bubbles() + batter_squelches(drag_upper)
    close += spoon_knocks() + spoon_catches()
    close += water_drops() + jar_clinks()
    hoots = jar_hoots()
    echo = room_echo(close + undb(-8) * hoots)  # the low hoot stirs the room less than the clinks
    return close + hoots + echo + kitchen_rumble() + kitchen_air()


def record(dry):
    """The recorder cuts steeply above 15.9 kHz."""
    return signal.sosfilt(signal.ellip(10, .2, 70, 15900, fs=SR, output="sos"), dry)


dry = scene()
out = record(dry)
wav_record(out)
```